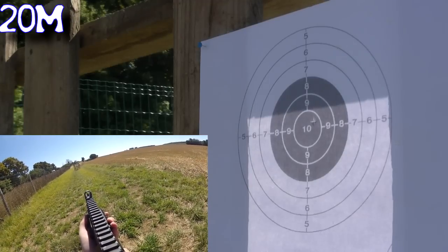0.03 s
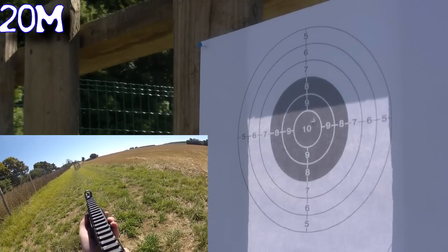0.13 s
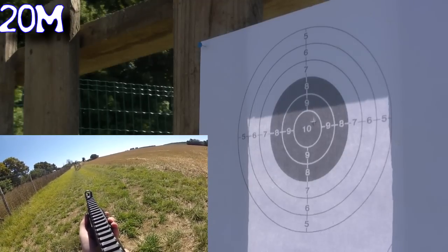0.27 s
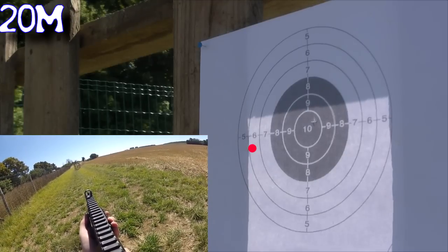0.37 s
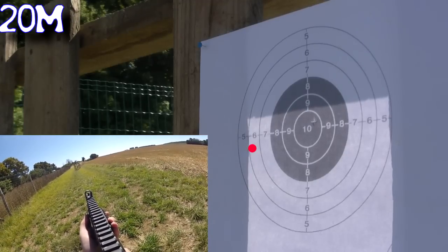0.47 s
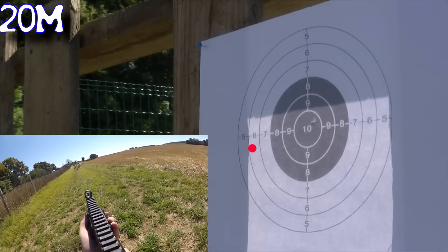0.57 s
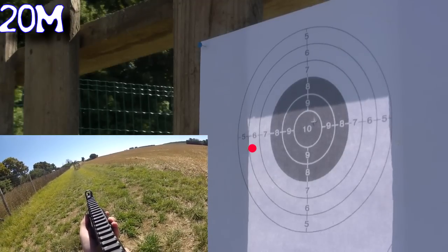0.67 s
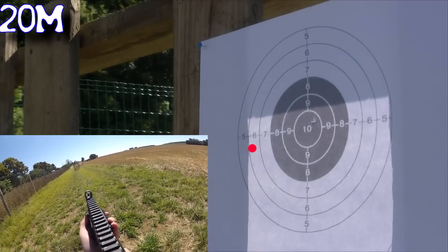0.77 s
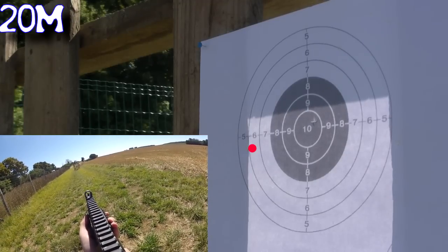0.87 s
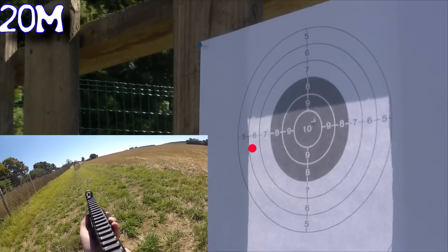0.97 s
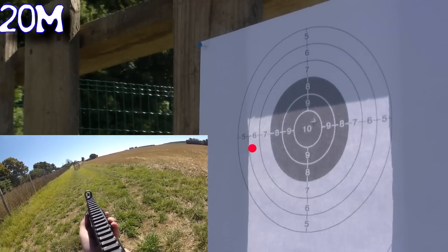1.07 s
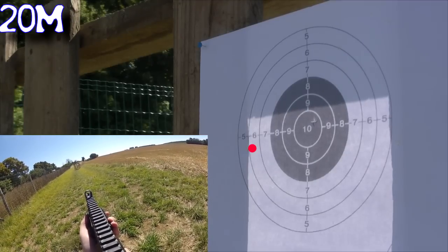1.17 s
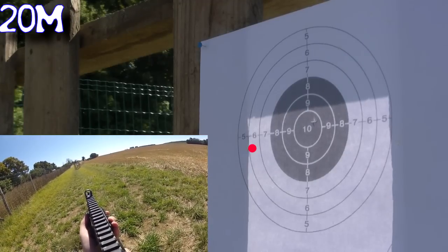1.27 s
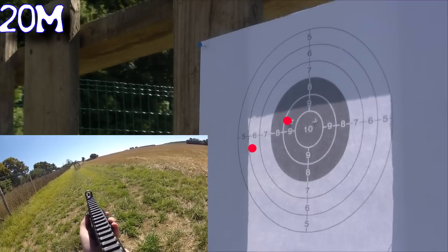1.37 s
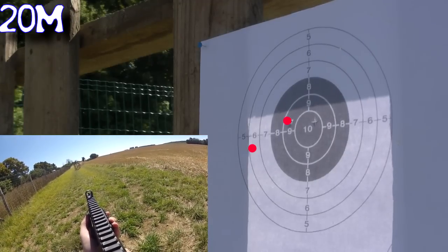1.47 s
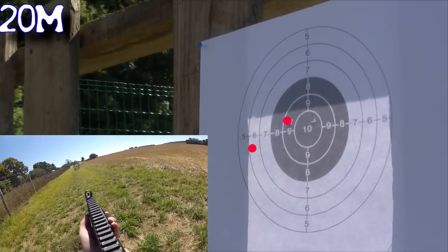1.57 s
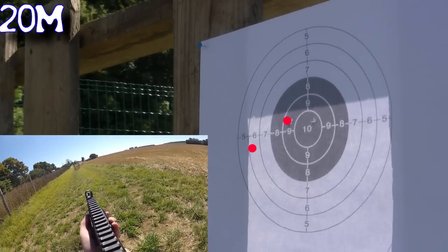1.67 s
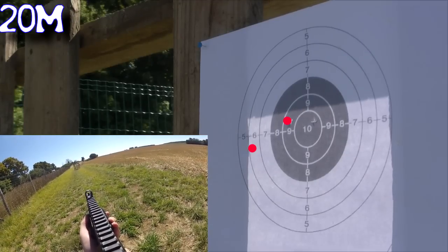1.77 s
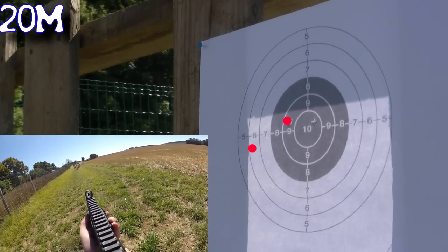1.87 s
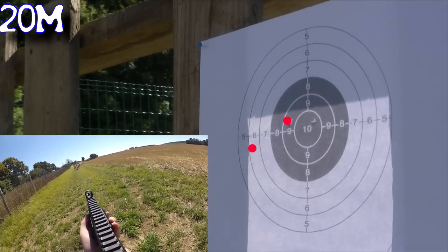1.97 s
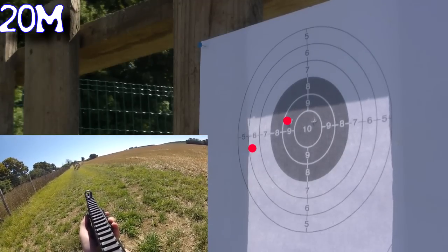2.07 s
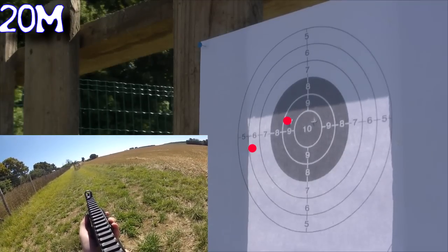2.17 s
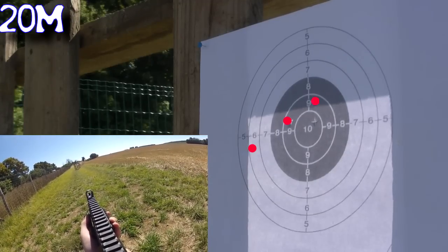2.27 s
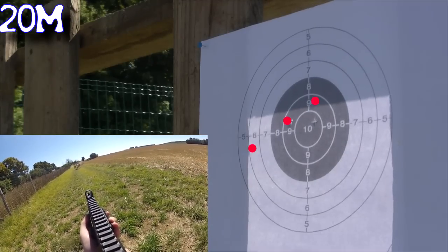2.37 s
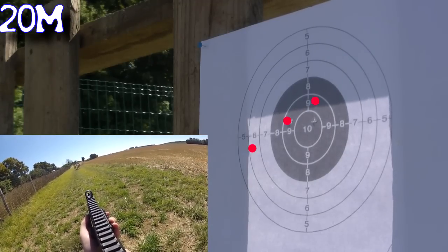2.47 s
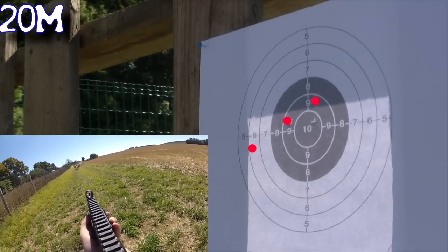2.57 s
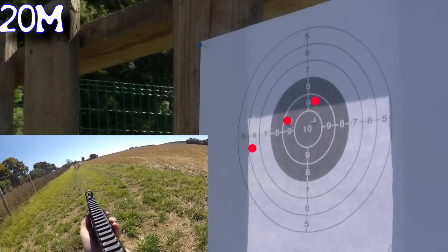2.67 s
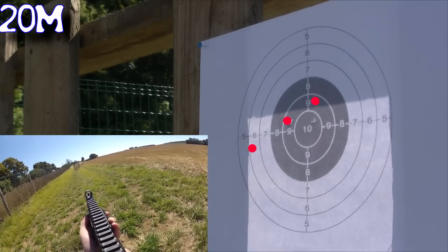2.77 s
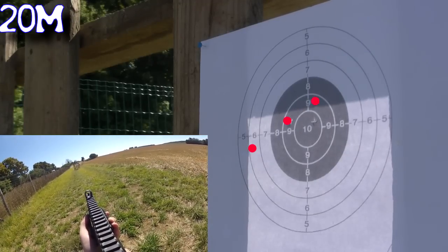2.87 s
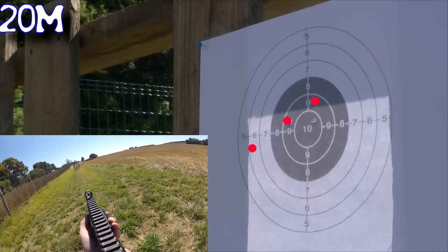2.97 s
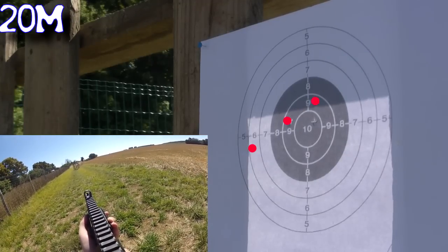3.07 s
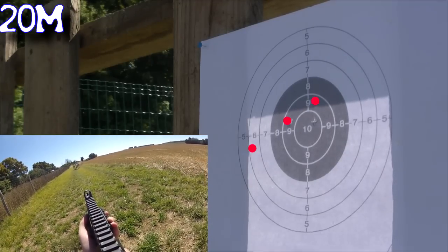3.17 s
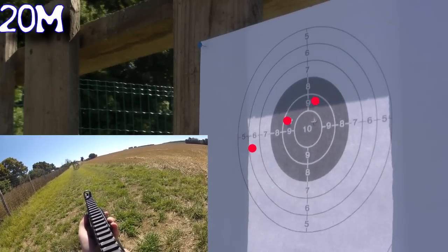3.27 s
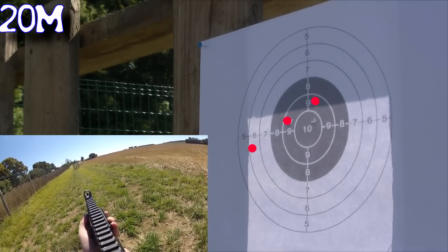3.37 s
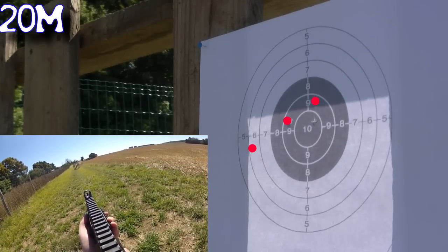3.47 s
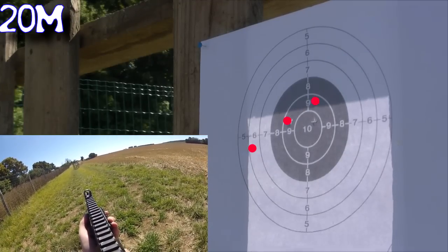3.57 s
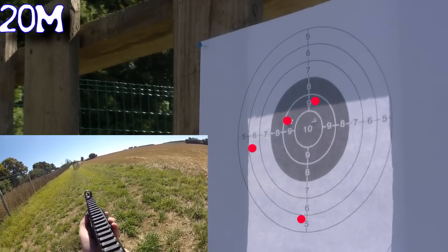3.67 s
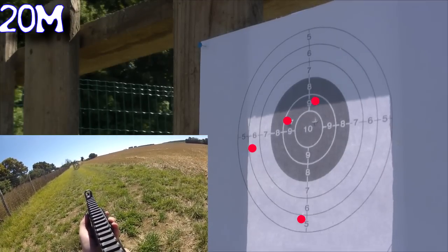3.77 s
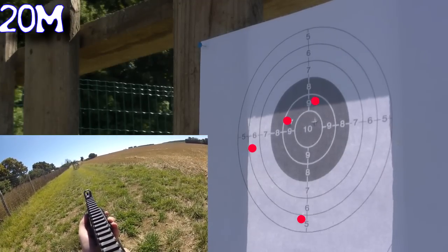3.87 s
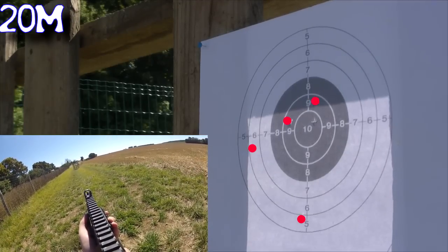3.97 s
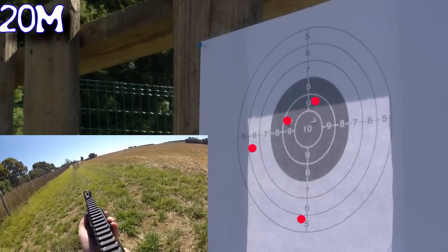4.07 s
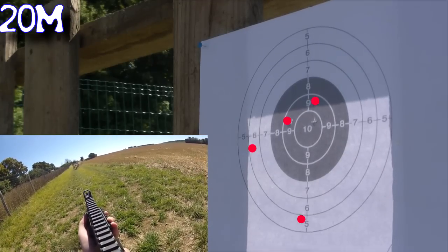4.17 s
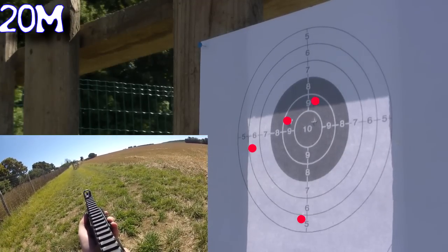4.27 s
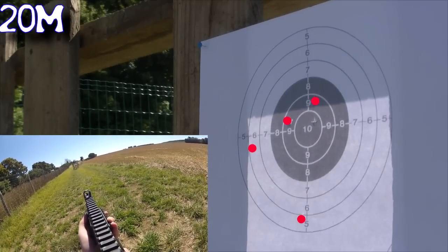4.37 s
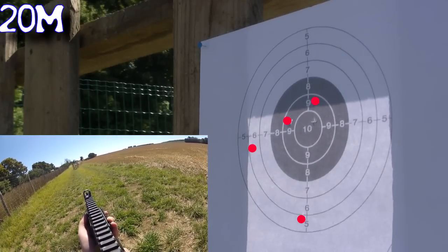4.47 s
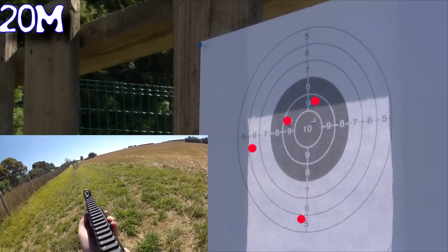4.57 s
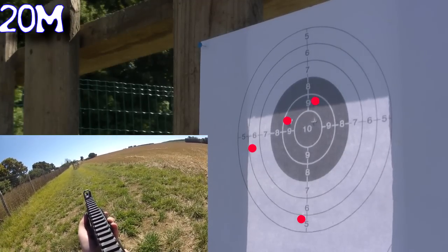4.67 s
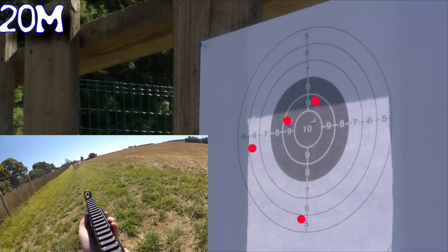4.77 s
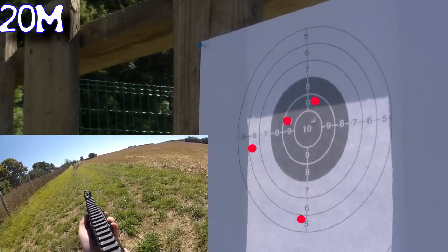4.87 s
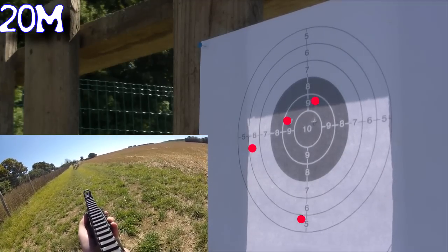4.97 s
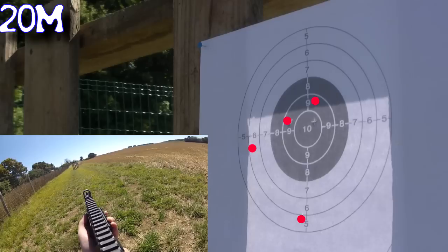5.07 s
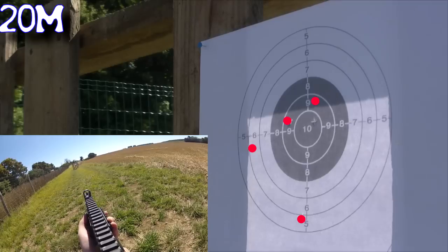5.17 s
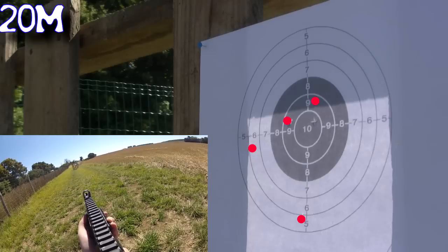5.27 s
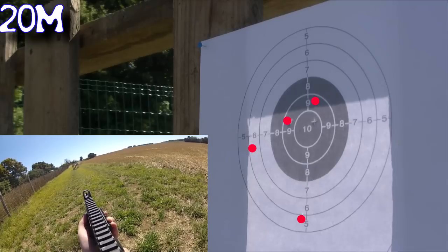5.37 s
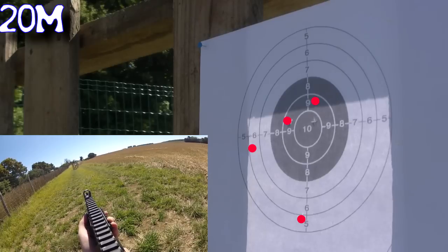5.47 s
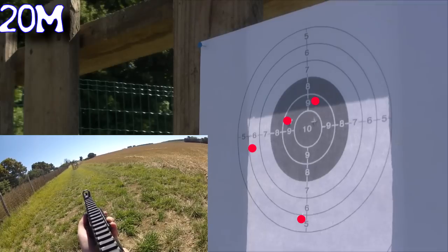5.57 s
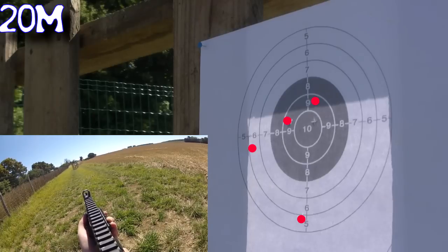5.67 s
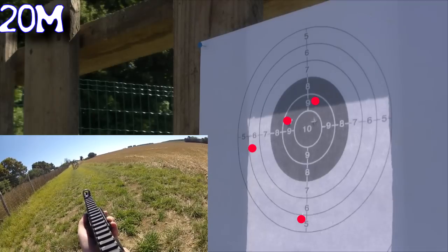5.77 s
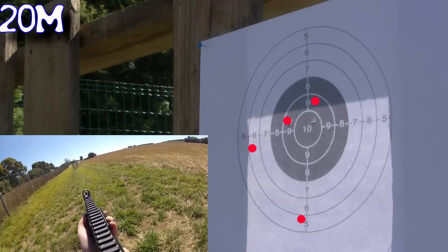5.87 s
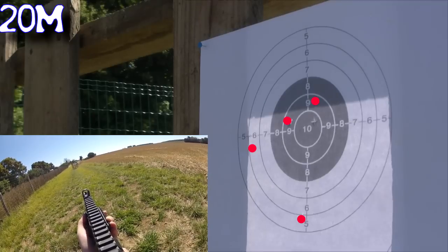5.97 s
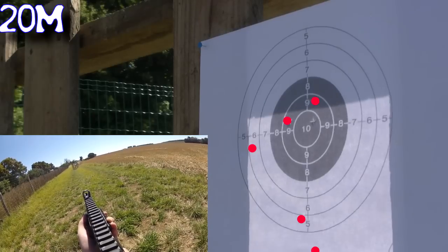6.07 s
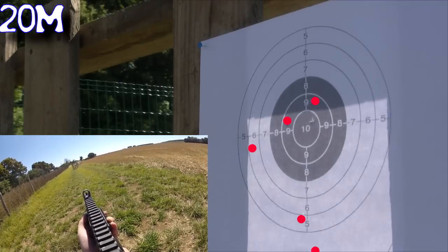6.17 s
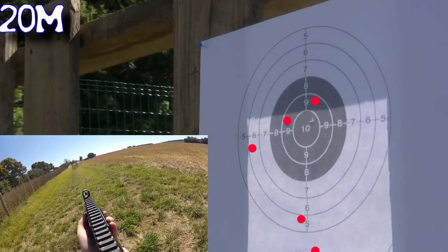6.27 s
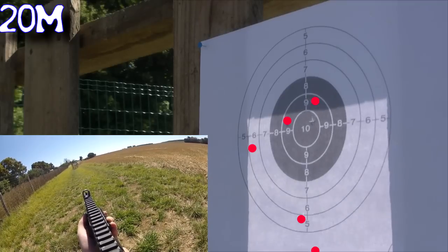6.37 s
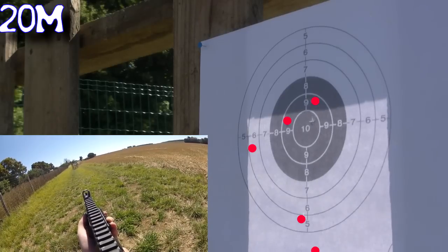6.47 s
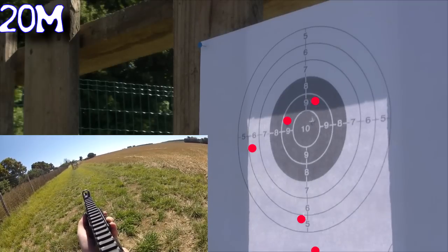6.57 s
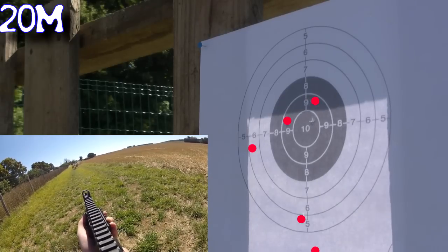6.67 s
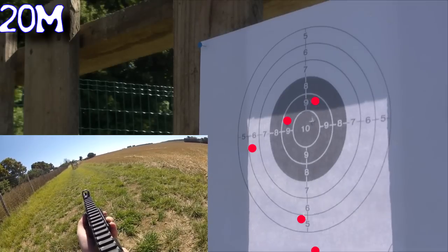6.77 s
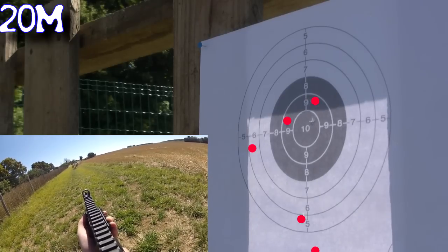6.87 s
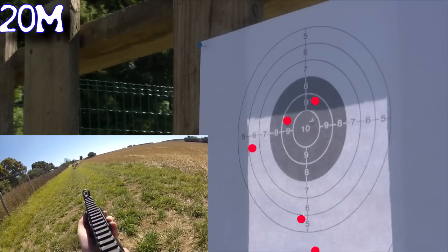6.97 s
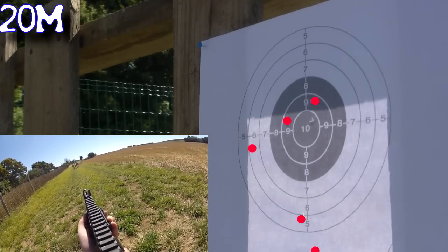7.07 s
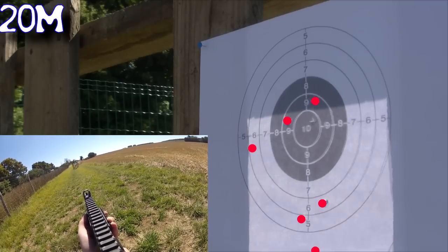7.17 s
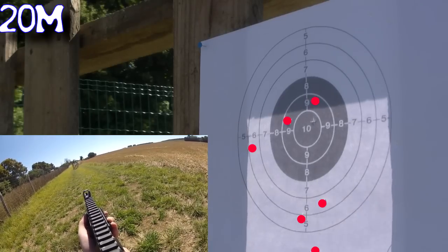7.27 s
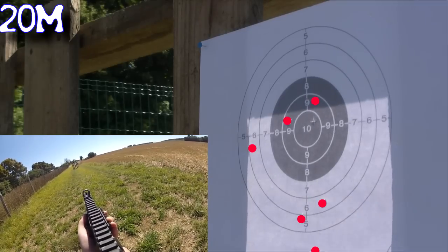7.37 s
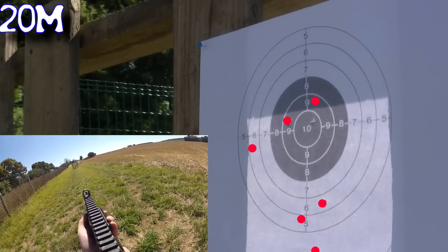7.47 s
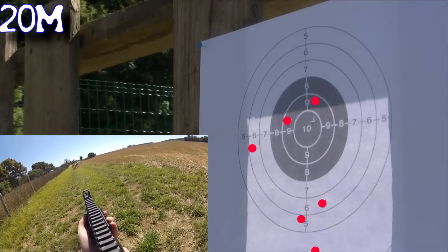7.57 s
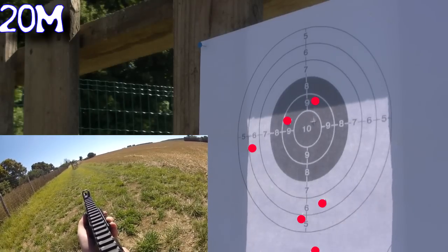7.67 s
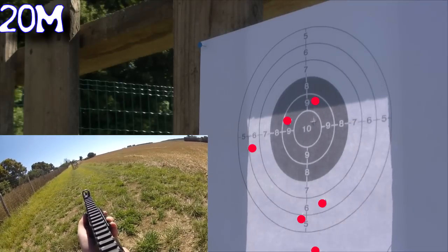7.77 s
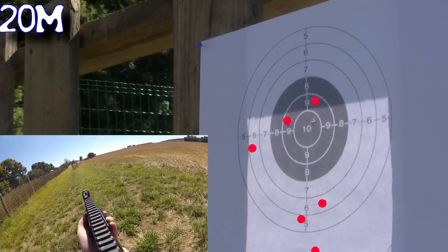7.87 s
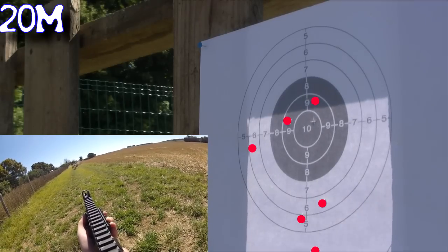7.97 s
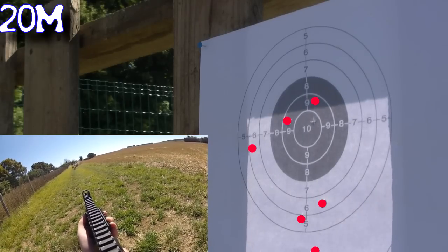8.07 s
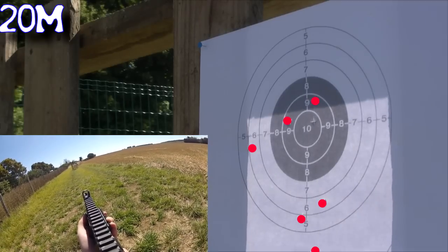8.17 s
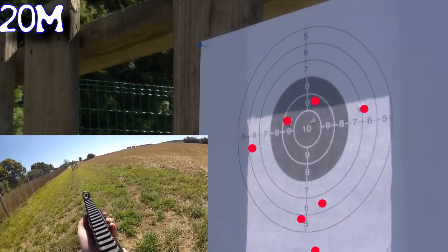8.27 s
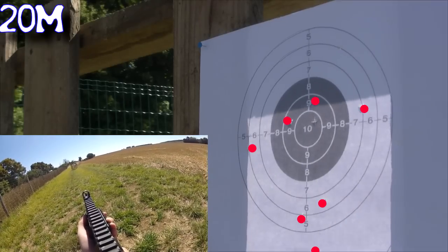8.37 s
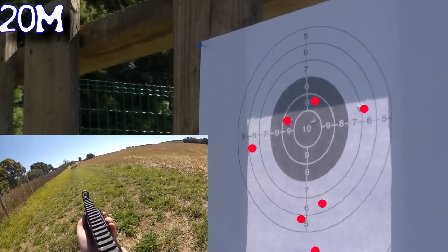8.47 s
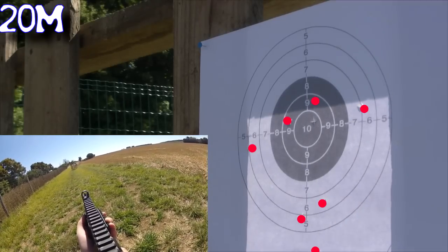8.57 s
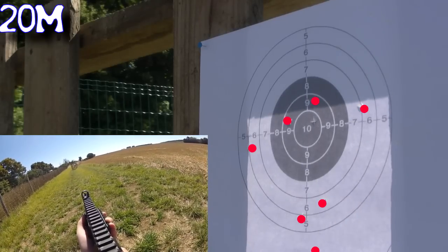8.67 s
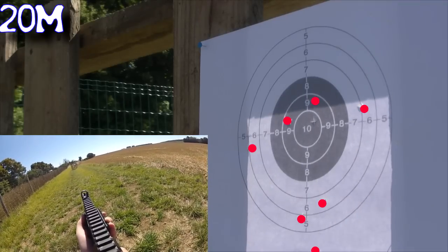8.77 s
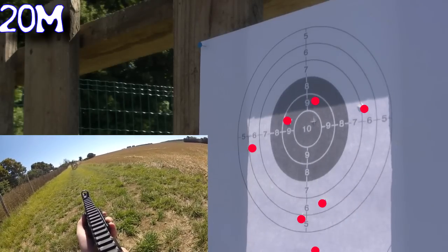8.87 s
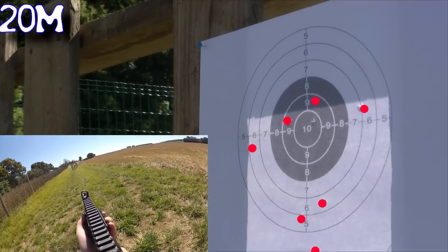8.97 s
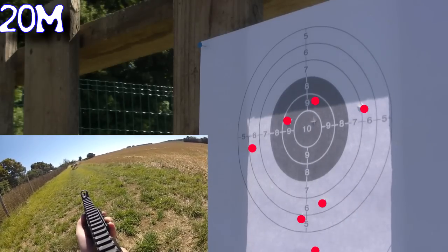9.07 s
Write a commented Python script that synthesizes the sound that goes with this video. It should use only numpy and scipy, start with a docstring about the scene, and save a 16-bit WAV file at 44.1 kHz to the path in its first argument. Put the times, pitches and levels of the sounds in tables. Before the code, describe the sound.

In an open grassy field, close microphones catch an airsoft rifle's sharp clattering cycle, then a dull clack returning from a board. Almost at once a pellet hisses in and smacks paper close to another microphone pair, the thinner distant slap arriving just after. This repeats eight times at uneven intervals, over faint hum, leaf hiss, small ticks, brief twitters and occasional wind buffeting.

```python
"""Over a faint hum and soft open-field noise, a gas airsoft rifle fires eight single shots at a paper target.
In each shot the sear clicks, gas pops, the bolt slams home and its spring twangs; a board echoes the knocks.
Then the pellet whizzes in and slaps the paper, heard by microphones at the target, and a wire fence rings.
The slap reaches the microphones by the rifle 0.12 s after that. Between shots come ticks and twitters, and
wind thumps from about 4 s. Noise bursts through resonances make the knocks; gliding sines make the pops."""
import sys
import numpy as np
from scipy import signal
from scipy.io import wavfile
from scipy.ndimage import uniform_filter1d

SR = 44100
rng = np.random.default_rng(int(sys.argv[2]) if len(sys.argv) > 2 else 0)


def generate_wav(sig):
    """Save sig (samples, or channels by samples) to the path in sys.argv[1] as 16-bit PCM at SR."""
    pcm = np.round(np.clip(np.atleast_2d(sig).T, -1, 1) * 32767).astype(np.int16)
    wavfile.write(sys.argv[1], SR, pcm)


N = 402633


def amp(db):
    """Turns decibels into a plain multiplier."""
    return 10 ** (np.asarray(db) / 20)


def evened(x):
    """Scales a signal to an rms of 1."""
    return x / np.sqrt(np.mean(x ** 2) + 1e-20)


def read(points, hz):
    """Reads a table of (pitch_hz, value) between its points, on a logarithmic pitch scale."""
    f, value = np.transpose(points)
    return np.interp(np.log(hz + 1), np.log(f + 1), value)


def add(mix, s, sound):
    """Adds a sound into the mix from s seconds on, cut off at the end."""
    part = mix[..., round(s * SR):][..., :sound.shape[-1]]
    part += sound[..., :part.shape[-1]]


def glide(pitch_hz):
    """A sine whose pitch follows the given curve: its turns are the running sum of the pitch."""
    return np.sin(2 * np.pi * np.cumsum(pitch_hz) / SR)


def ring(x, modes):
    """Passes x through dying sines (pitch_hz, t60_ms, level_db) of alternate sign, total energy 1."""
    t = np.arange(4000) / SR
    taps = np.zeros(len(t))
    for k, (hz, ms, db) in enumerate(modes):
        dying = amp(db - 60 * 1000 * t / ms) / np.sqrt(ms)
        taps += (-1) ** k * dying * np.sin(2 * np.pi * hz * t)
    taps = taps[None] / np.linalg.norm(taps)
    return signal.oaconvolve(x, taps, axes=1)[:, :x.shape[1]]


def noise(spectrum, same, size):
    """Two channels of coloured noise at rms 1, with a given left-right likeness by frequency."""
    frames, hz = N // (size // 4) + 5, np.fft.rfftfreq(size, 1 / SR)
    a, b, c, d = rng.standard_normal((frames, len(hz), 4)).T
    same = np.clip(read(same, hz), -1, 1)[:, None]
    left = a + 1j * b
    right = same * left + np.sqrt(1 - same ** 2) * (c + 1j * d)
    z = np.array([left, right]) * amp(read(spectrum, hz))[:, None]
    sound = signal.istft(z, nperseg=size, noverlap=size - size // 4)[1]
    return evened(sound[:, :N])


# How long sound scattered off hedge and grass lasts: pitch_hz, t60_s (time to die by 60 dB)
FIELD_DECAY = [(200, 0.25), (1000, 1), (4000, 0.72), (9000, 0.68), (16000, 0.094)]


def scatter(x, rise_s):
    """Sparse reflections of random sign that swell in and then die at a rate that depends on pitch."""
    taps = np.zeros((2, SR))
    at = np.arange(0, SR - 20, 20) + rng.integers(0, 20, (2, SR // 20 - 1))
    np.put_along_axis(taps, at, rng.choice([-1., 1.], at.shape), 1)
    hz, t, z = signal.stft(taps, SR, nperseg=256)
    dying = amp(-60 * t / read(FIELD_DECAY, hz)[:, None])
    swelling = 1 - np.exp(-(t / rise_s) ** 2)
    tail = signal.istft(z * dying * swelling, SR, nperseg=256)[1]
    return signal.oaconvolve(x, tail / np.linalg.norm(tail[0]), axes=1)[:, :N]


# Colour of the open-field rush: pitch_hz, relative level_db per Hz
AIR_COLOUR = [(20, -14), (45, -11), (90, -19), (150, -10.5), (260, -5), (360, -3), (1130, -8), (1970, -13),
              (3910, -15), (5090, -25.5), (9000, -26.5), (13500, -25), (15300, -31.5), (16300, -51)]
# Left-right likeness of the rush: pitch_hz, likeness (-1 opposite to 1 equal)
AIR_LIKENESS = [(60, 0.7), (130, 0.29), (290, -0.87), (640, -0.62), (1410, -0.51), (3100, -0.32), (6820, 1),
                (15000, -0.77)]
# Electrical hum and whine: pitch_hz, level_db (rms)
HUM = [(59.3, -71.5), (118.4, -68.5), (177.6, -72.5), (1093, -76), (3284, -77), (3500, -77.5),
       (6990, -77.5), (10487, -78), (13124, -79), (13964, -83)]
# Faint distant notes: start_s, length_s, start_pitch_hz, end_pitch_hz, level_db (rms at the middle)
FAR_NOTES = [(2.72, 0.21, 246, 242, -62.5), (7.705, 0.26, 239, 240, -62)]


def background():
    """Coloured noise with a drifting level, steady sines for the hum, and a few far notes."""
    air_db, drift_db = -51, .7
    t = np.arange(N) / SR
    drift = np.zeros(N)
    for f in np.geomspace(.2, 8, 20):
        drift += np.sin(2 * np.pi * (f * t + rng.random())) / np.sqrt(f)
    out = amp(air_db + drift_db * evened(drift)) * noise(AIR_COLOUR, AIR_LIKENESS, size=1024)
    for hz, db in HUM:
        out += np.sqrt(2) * amp(db) * np.sin(2 * np.pi * (hz * t + rng.random()))
    for s, length, hz0, hz1, db in FAR_NOTES:
        v = np.arange(0, 1, 1 / length / SR)
        note = np.sin(np.pi * v) * glide(hz0 + (hz1 - hz0) * v)
        add(out, s, np.sqrt(2) * amp(db) * note)
    return out


# Colour of the grass and leaves: pitch_hz, relative level_db per Hz
LEAF_COLOUR = [(1500, -29), (3000, -6.5), (4000, -4), (7000, -2.5), (11000, -9.5), (15000, -18),
               (16300, -46)]


def rustle():
    """Grass and leaves hiss faintly and steadily: coloured noise, mostly treble."""
    return amp(-64) * noise(LEAF_COLOUR, [(2000, 0.25), (12000, .1)], size=512)


# Spells of a faint flickering tone: start_s, length_s, level_db (before random spread), pitch_hz
TWITTER = [(0.526, .16, -56, 3490), (4.999, .17, -55, 3530), (6.4, .07, -54, 3477), (9.07, .05, -52, 3550)]


def twitter():
    """Uneven runs of short, slightly falling blips, each with a smeared echo."""
    blip_s, blips_per_s = .018, 45.
    level_spread_db, pitch_spread, pitch_fall = 3, .02, .05  # pitch settings are shares of the pitch
    out, v = np.zeros((2, N)), np.arange(0, 1, 1 / blip_s / SR)
    for start, length, db, hz in TWITTER:
        late, size, pitch = rng.standard_normal((20, 3)).T
        for k, s in enumerate(np.arange(start, start + length, 1 / blips_per_s)[:20]):
            pitch_hz = hz * (1 + pitch_spread * pitch[k] + pitch_fall * (.5 - v))
            blip = np.sin(np.pi * v) ** 2 * glide(pitch_hz)
            add(out, s + 0.24 * late[k] / blips_per_s, amp(db + level_spread_db * size[k]) * blip)
    return out + amp(-4) * scatter(out, .005)


# Strength of the wind on the microphones: time_s, level_db (before buffets)
WIND = [(0, -62), (.47, -51.5), (1.0, -71), (1.45, -59), (1.8, -64), (2.4, -58.5), (3.0, -59.5), (3.3, -59),
        (3.7, -51), (3.95, -45.5), (4.07, -55), (4.21, -47.5), (4.4, -62.5), (5.3, -67.5), (5.95, -63),
        (6.17, -48), (6.33, -59), (6.58, -52), (6.7, -38.5), (6.85, -48.5), (7.35, -61), (7.52, -53),
        (7.7, -61.5), (9.13, -63)]
# Colour of the wind rumble: pitch_hz, relative level_db per Hz
RUMBLE_COLOUR = [(15, -4.5), (40, 2), (80, -6.5), (150, -15.5), (260, -35.5), (600, -66.5)]
# Single dull thumps on the microphones: start_s, level_db, pitch_hz, left_minus_right_db
THUMPS = [(3.83, -41, 59.2, 14), (4.537, -50.5, 64.6, -24), (6.209, -41, 53.8, -15.5),
          (6.629, -40, 61.9, 22), (7.443, -46.5, 49, 17), (7.549, -42, 59.2, -7)]


def wind():
    """Low rumble in random buffets, partly alike left and right, and a few single thumps."""
    buffet_s, buffet_db, thump_turns = 0.052, 4, 1.35
    t = np.arange(N) / SR
    steps = np.arange(0, t[-1] + 1, buffet_s)
    buffets = np.interp(t, steps, rng.standard_normal(len(steps)))
    strength_db = np.interp(t, *np.transpose(WIND)) + buffet_db * buffets
    out = amp(strength_db) * noise(RUMBLE_COLOUR, [(40, 0.34), (130, 0.18)], size=2048)
    for s, db, hz, pan_db in THUMPS:
        v = np.arange(0, 1, hz / thump_turns / SR)
        thump = np.sin(np.pi * v) * np.sin(2 * np.pi * thump_turns * v)
        add(out, s, amp(db + np.array([[pan_db], [-pan_db]]) / 2) * thump)
    return out


# Small bright ticks: late echoes of two slaps (at 0.6327 and 5.085 s), spent pellets and grass:
# start_s, level_db, pitch_hz
TICKS = [(0.6327, -39, 5370), (1.1292, -24, 7200), (1.1522, -34, 4900), (3.8761, -40, 3470),
         (5.085, -49, 3450), (5.619, -45.5, 4000), (8.5053, -38.5, 3157), (8.884, -46.5, 4330)]


def ticks():
    """Tiny bright clicks: dying noise through two very short resonances."""
    out, t = np.zeros((2, N)), np.arange(1500) / SR
    for s, db, hz in TICKS:
        burst = rng.standard_normal((2, len(t))) * amp(-60 * t / 0.023)
        add(out, s, amp(db) * ring(burst, [(hz, 1.5, 0), (10500, 1.2, -10)]))
    return out


def slap(slap_db, slap_hz, rattle_db, rattle_hz, rattle_ms):
    """A sharp push and a longer pull of the paper, and a brief bright rattle of the backing."""
    t = np.arange(1800) / SR
    turns = .3 * (1 - np.exp(-t / .00007)) + slap_hz * t  # the swing starts fast and slows
    # full strength for half a swing, then 60 dB down over three swings
    push = amp(slap_db - 60 * np.maximum(slap_hz * t - .5, 0) / 3) * np.sin(2 * np.pi * turns)
    shared, own = rng.standard_normal(len(t)), rng.standard_normal((2, len(t)))
    dying = amp(-6e4 * t / rattle_ms) + amp(-25 - 60 * t / 0.074)
    shake = (shared + 0.54 * own) * dying
    backing = [(1400, 2.5, -8), (2200, 1.5, -6), (3500, 1.5, -6), (5500, 1.1, -5),
               (rattle_hz, 1.3, 0), (11000, .8, -6)]
    return push + amp(rattle_db) * ring(shake, backing)


# Pellet impacts, levels relative: start_s, slap_db, slap_pitch_hz, rattle_db, rattle_pitch_hz, rattle_t60_ms,
# level_from_afar_db (peak before filtering), fence_db, whizz_db
HITS = [(0.3946, 1, 5400, -5.5, 7500, 13, -4, -57, -34.5),
        (1.3815, 4, 2100, -8.5, 5830, 6.5, -10.5, -59.5, -36.5),
        (2.3116, -0.5, 1740, -9.5, 6000, 5.2, -9, -52.5, -38),
        (3.689, 1.5, 2520, -10.5, 5070, 5.5, -8, -50.5, -38),
        (4.8452, -2, 2253, -5.5, 8560, 13.73, -9, -50.5, -37),
        (6.1012, 2, 4300, -14, 6130, 4.5, -21.5, -50, -37.5),
        (7.2176, 1.5, 2656, -11.5, 4900, 7.5, -8, -50.5, -37),
        (8.3143, 3.5, 1890, -7.5, 5410, 5.6, -9.5, -59, -38)]
# Colour of the pellet's whizz: pitch_hz, relative level_db per Hz
WHIZZ_COLOUR = [(120, -55.5), (200, 0), (334, -13), (473, -23.5), (1060, -2.5), (2090, 2), (3690, -3.5),
                (8900, -7.5), (13300, -21), (16000, -38.5)]


def target():
    """Near pair: whizz, slap and the fence wire ringing. Far pair: the slap upside down and thinner."""
    far_delay_s, fence_hz, fence_t60_s = .1204, 1163, 2.22
    near, far = np.zeros((2, N)), np.zeros((2, N))
    fence, flight, passing = np.zeros((3, N))
    t, before = np.arange(SR) / SR, np.arange(-.13, .03, 1 / SR)
    # the swish grows until the impact, then drops steeply
    swish = amp(68 * before - 2100 * np.maximum(before, 0)) * np.clip((before + 0.26) / 0.12, 0, 1)
    whoop = np.exp(-((before + 0.0052) / 0.009) ** 2)  # a hollow note as the pellet draws level
    for s, slap_db, slap_hz, rattle_db, rattle_hz, rattle_ms, far_db, fence_db, whizz_db in HITS:
        sound = slap(slap_db, slap_hz, rattle_db, rattle_hz, rattle_ms)
        add(near, s, sound)
        add(far, s + far_delay_s, -amp(far_db) * sound / abs(sound).max())
        dying = amp(-60 * t / fence_t60_s) + amp(4 - 60 * t / 0.3)
        add(fence, s, amp(fence_db) * dying * np.sin(2 * np.pi * fence_hz * t))
        add(flight, s + before[0], amp(whizz_db) * swish)
        add(passing, s + before[0], amp(whizz_db + 3.5) * whoop)
    near = signal.sosfilt(signal.butter(2, 350, "high", fs=SR, output="sos"), near)
    far = signal.sosfilt(signal.butter(2, [1150, 10000], "band", fs=SR, output="sos"), far)
    far *= amp([[-.7], [.7]])  # a little to the right
    # the spinning pellet flutters
    flutter = amp(5.0 * evened(uniform_filter1d(rng.standard_normal(N), 200)))
    whizz = flight * noise(WHIZZ_COLOUR, [(500, 0.49), (5000, .2)], size=256)
    spin = amp(-15.5) * flight * flutter * rng.standard_normal((2, N))
    whizz += ring(spin, [(970, 18, -3.5), (1910, 14, 8), (3150, 10, 7.5)])
    hollow = passing * rng.standard_normal((2, N))
    whizz += ring(hollow, [(1810, 9, -0.5), (1200, 2.6, -25.0), (2900, 5.8, -11.0)])
    by_target = near + amp(-37) * scatter(near, 0.017) + fence + whizz
    return by_target, far + amp(-20.0) * scatter(far, .02)


# The sharpest knocks of a cycle, thrown back by the board: share_of_cycle (sear to bolt home), t60_ms,
# level_db (before random spread)
THROWN = [(.13, 10, -21), (.22, 30, -31), (.43, 14, -19), (1., 16, -25)]
# Colour of the board: pitch_hz, t60_ms, relative level_db
BOARD = [(1000, 5, -7), (1950, 7, 0), (3100, 7, 0), (6000, 1.5, -16)]


def echo():
    """The knocks return from the board as short dull clacks, a little to the left."""
    round_trip_s = .113
    knocks, u = np.zeros(N), np.arange(1500) / SR * 1000  # u in ms
    for sear, _, home, _, _ in SHOTS:
        for share, t60, db in THROWN:
            strength = amp(db + 2. * rng.standard_normal() - 60 * u / t60)
            add(knocks, sear + share * (home - sear) + round_trip_s, strength)
    rough = noise([(20, 0.032), (20000, 0.0055)], [(500, 1.0), (5000, 0.4)], size=256)
    return ring(knocks * rough, BOARD) * amp([[1.5], [-1.5]])


# Shots: sear_click_s, strength_db, bolt_home_s, bolt_strength_db, spring_twang_db (all relative)
SHOTS = [(.2048, 0, .2527, 0, -48), (1.1856, 0, 1.2345, -2, -49), (2.1092, 0, 2.1588, 0, -46),
         (3.4833, 0, 3.5331, 0, -50), (4.637, 0, 4.6882, 1, -52), (5.8895, 0, 5.9412, 0, -49),
         (7.0046, 0, 7.0572, 0, -51), (8.0901, -1, 8.1433, 1, -49)]
# Knocks in one cycle: share_of_cycle (sear to bolt home), rise_ms, t60_ms, body_db, steel_db (relative)
ACTION = [(-.04, 1.3, 53, -24.5, -25.5), (-.004, 0.27, 1.3, -10.5, -7.5), (.12, 4.2, 39, -16, -14.5),
          (.21, 1.1, 26, -3, -2), (.29, 2.2, 15, -5, 1), (.41, .4, 16, -2, -9), (.5, .7, 22, 0, -2),
          (.63, .5, 61, -13, -14), (.82, 0.87, 18, -16, -10), (1., 0.19, 15, -10.5, -1),
          (1.05, 1.2, 45, -12, -8)]
# Gas pops from muzzle and port: share_of_cycle, start_pitch_hz, end_pitch_hz, length_ms, level_db (relative)
POPS = [(.118, 800, 2200, 5.8, -2.5), (.14, 95, 70, 22., -17), (.15, 330, 240, 12., -14),
        (.4, 700, 260, 7., -7), (.2, 45, 30, 35., -24)]
# Resonances of the receiver and stock: pitch_hz, t60_ms, relative level_db
BODY = [(260, 27, -7.5), (393, 75, -13), (910, 11, -3.5), (1370, 9.2, -4), (1940, 4.8, 2), (2760, 3.7, 2.5),
        (3900, 4.1, -3)]
# Resonances of the steel bolt and barrel: pitch_hz, t60_ms, relative level_db
STEEL = [(2900, 0.82, -2), (4170, 0.96, -2), (6614, 3.1, -4.5), (8100, 3.3, -6), (8930, 2.4, -6),
         (11700, 0.56, -18.5)]
# Ringing of the bolt only when it lands: pitch_hz, t60_ms, relative level_db
BOLT = [(4100, 25, -6), (6800, 15, -4), (8685, 42, 0), (9900, 25, -8)]
# Wavering recoil spring: time_after_landing_s, pitch_hz, relative level_db
TWANG = [(.02, 230, -14), (.055, 365, -6), (.1, 355, -2), (.14, 290, -2), (.18, 290, -6), (.195, 270, -27)]


def rifle():
    """Each step of the action shakes body and steel with a rough burst; gas pops glide in pitch."""
    body, steel, landing, gas_and_spring = np.zeros((4, N))
    u = np.arange(-600, 3500) / SR * 1000  # ms around each knock
    after, twang_hz, twang_db = np.transpose(TWANG)
    w = np.arange(after[0], after[-1], 1 / SR)
    twang = amp(np.interp(w, after, twang_db)) * glide(np.interp(w, after, twang_hz))
    for sear, shot_db, home, home_db, spring_db in SHOTS:
        cycle_s = home - sear
        for share, rise, t60, body_db, steel_db in ACTION:
            force_db = (home_db if share > .9 else shot_db) + 0.95 * rng.standard_normal()
            shape = np.where(u < 0, np.exp(-(u / rise) ** 2), amp(-60 * np.maximum(u, 0) / t60))
            shape = shape * amp(force_db)
            s = sear + share * cycle_s + u[0] / 1000
            add(body, s, amp(body_db) * shape)
            add(steel, s, amp(steel_db) * shape)
        for share, hz0, hz1, ms, db in POPS:
            v = np.arange(0, 1, 1000 / ms / SR)
            pop = np.sin(np.pi * v ** 0.85) * glide(hz0 + (hz1 - hz0) * v ** 1.8)
            add(gas_and_spring, sear + share * cycle_s, amp(db + shot_db) * pop)
        add(landing, home, amp([home_db + 9]))  # a single-sample blow
        waver = evened(uniform_filter1d(rng.standard_normal(len(w)), 900))
        add(gas_and_spring, home + after[0], amp(spring_db + 3.4 * waver) * twang)
    low_likeness = [(60, -0.17), (500, 0.94), (1500, 0.85), (3200, -0.3)]
    low = noise([(20, 0.0098), (20000, 0.0061)], low_likeness, size=256)
    high = rng.standard_normal((2, N))  # the bright clatter reaches the two ports unalike
    blow = np.array([landing, np.roll(landing, 1)])  # one sample later on the right
    bright = ring(steel * high, STEEL) + ring(blow, BOLT)
    return ring(body * low, BODY) + bright * amp([[1.5], [-1.5]]) + gas_and_spring


def gain_control(x):
    """Turns the level down by 0.3 dB for each dB of recent power over -33.5 dB, then lets it recover."""
    power_db = 10 * np.log10(abs(uniform_filter1d((x ** 2).mean(0), 600, origin=299)) + 1e-12)
    fall = np.arange(N) * 100. / SR  # the held peak sinks 100 dB per second
    held_db = np.maximum.accumulate(power_db + fall) - fall
    over_db = np.maximum(held_db + 33.5, 0)
    return x / amp(.3 * uniform_filter1d(over_db, 900, origin=449))


def scene():
    """Mixes the two microphone pairs; only the pair by the rifle has gain control."""
    gun, (near, far) = rifle(), target()
    by_rifle = gun + echo() + amp(-34.5) * scatter(gun, 0.076) + far + ticks() + wind()
    return gain_control(by_rifle) + near + twitter() + background() + rustle()


def record(dry):
    """Loud peaks overload and flatten; then a filter takes away the highest treble."""
    edge_hz = 16350
    clipped = np.clip(dry, -.97, .97)
    taps = signal.firwin(255, edge_hz, window=("kaiser", 7), fs=SR)
    return signal.oaconvolve(clipped, taps[None], "same")


dry = scene()
out = record(dry)
generate_wav(out)
```